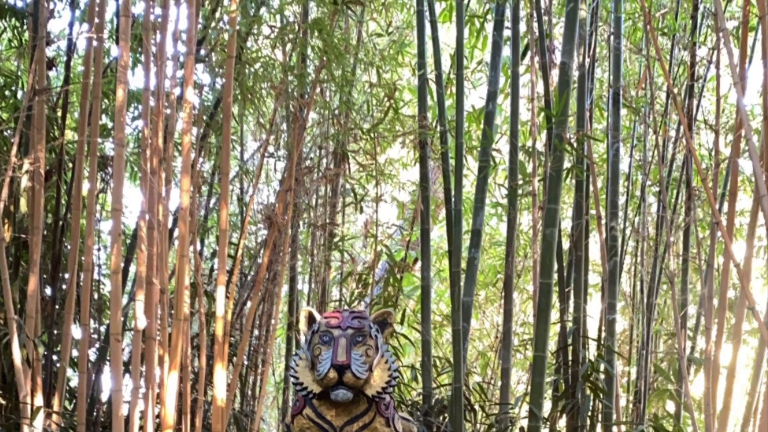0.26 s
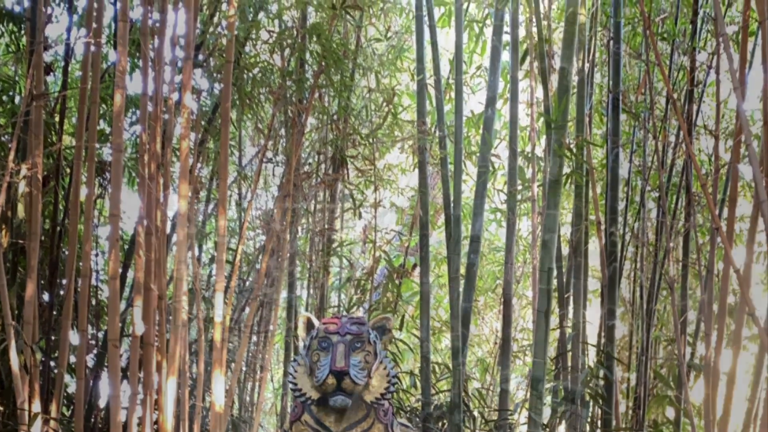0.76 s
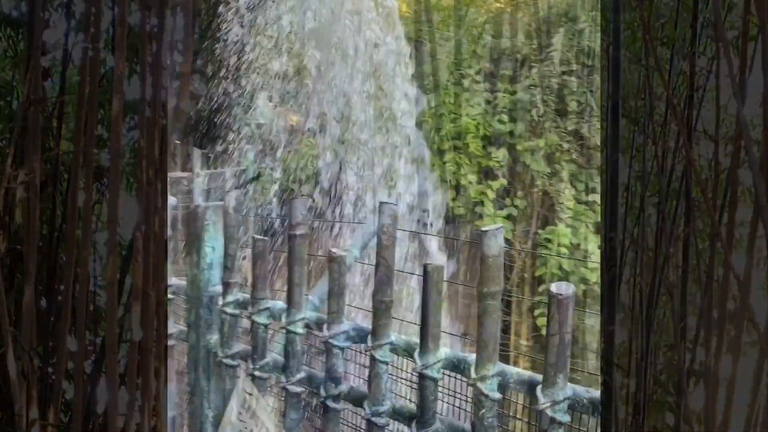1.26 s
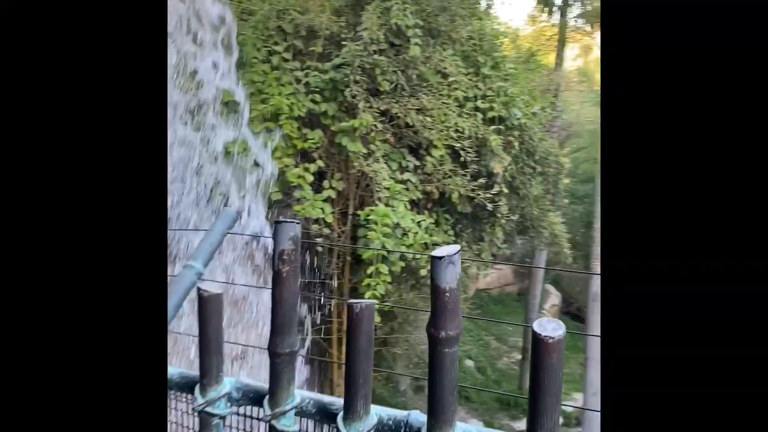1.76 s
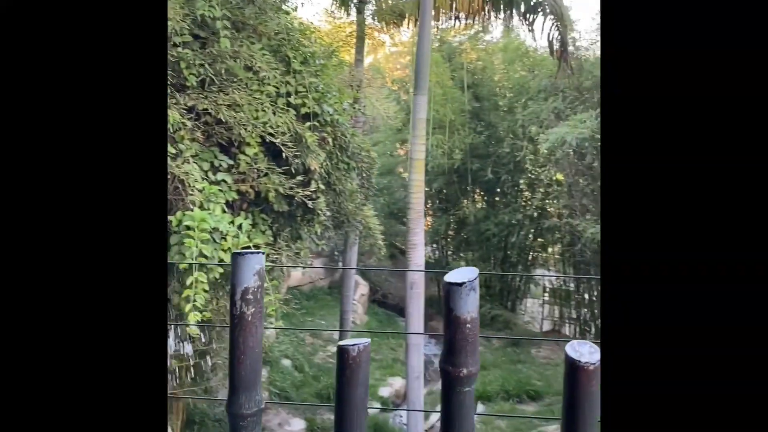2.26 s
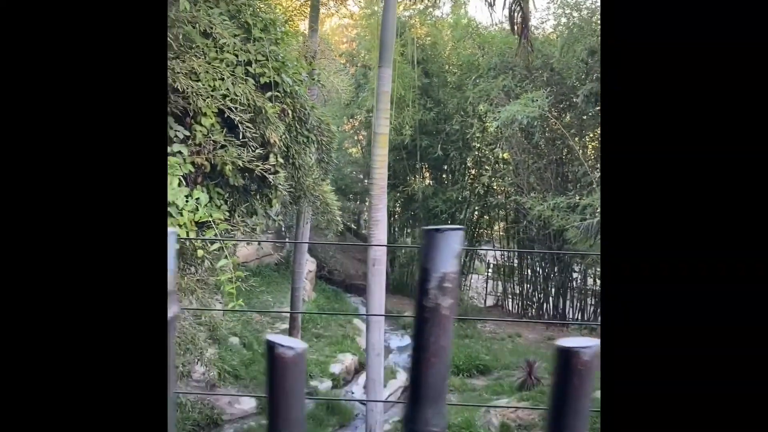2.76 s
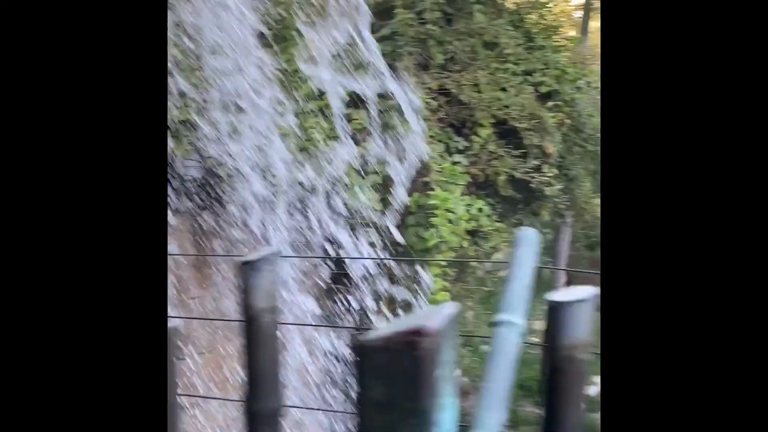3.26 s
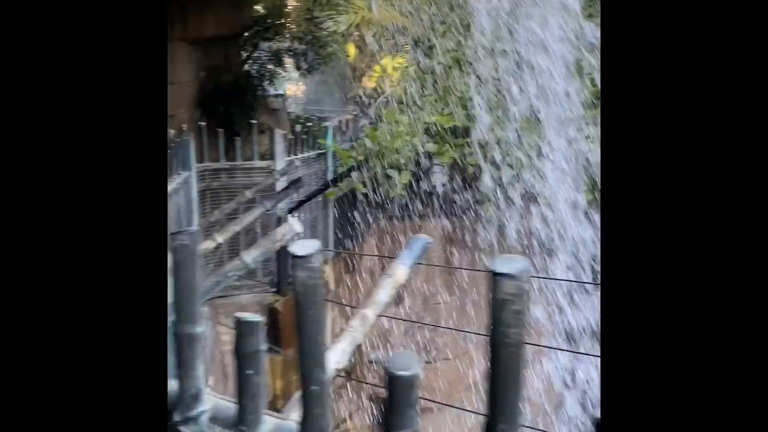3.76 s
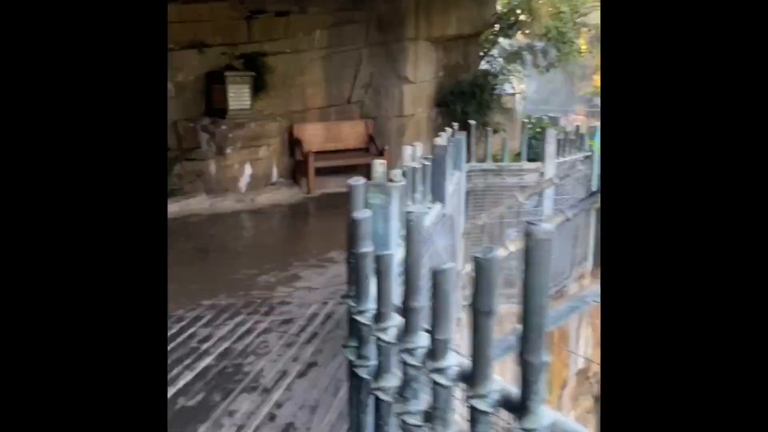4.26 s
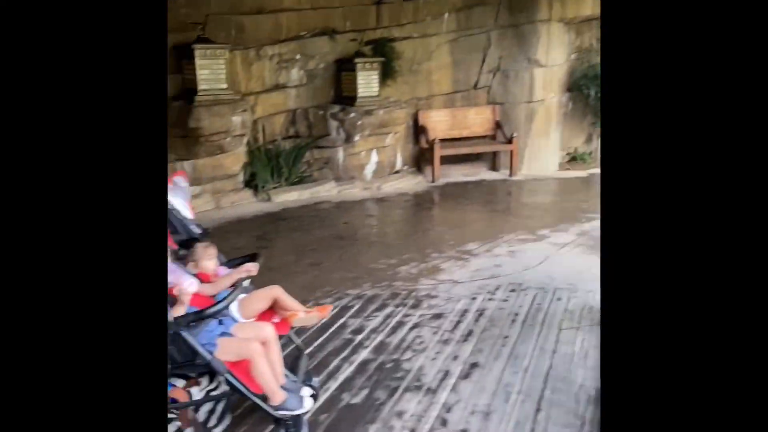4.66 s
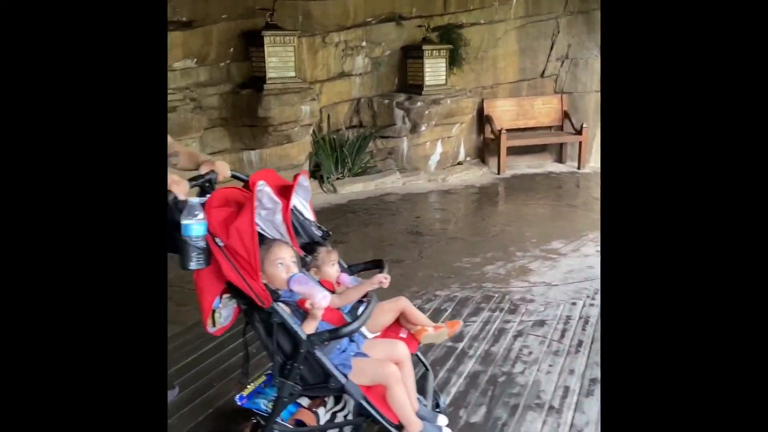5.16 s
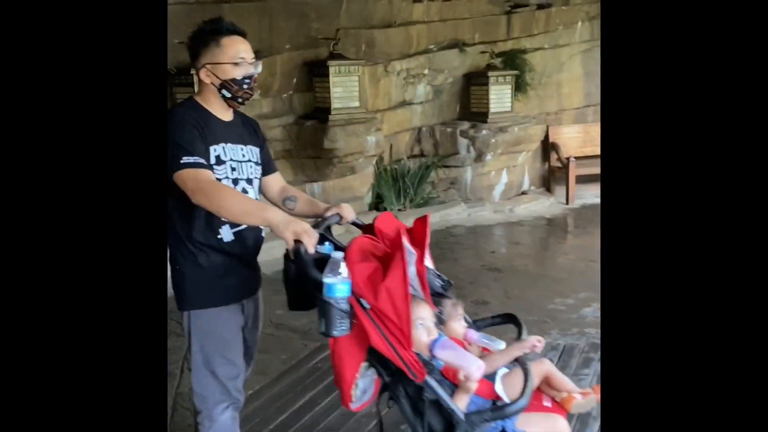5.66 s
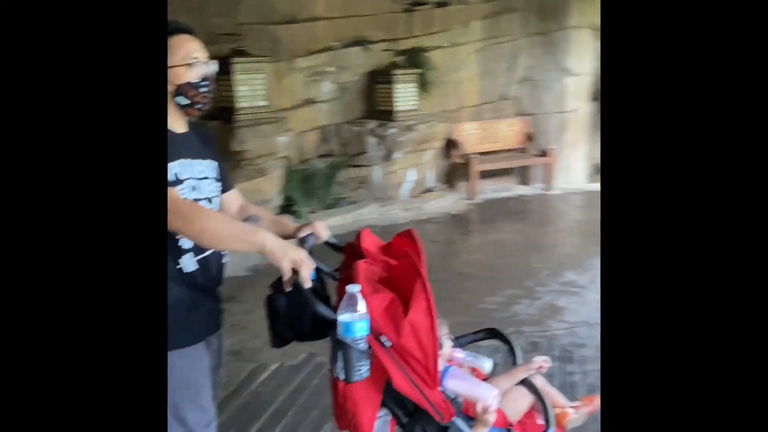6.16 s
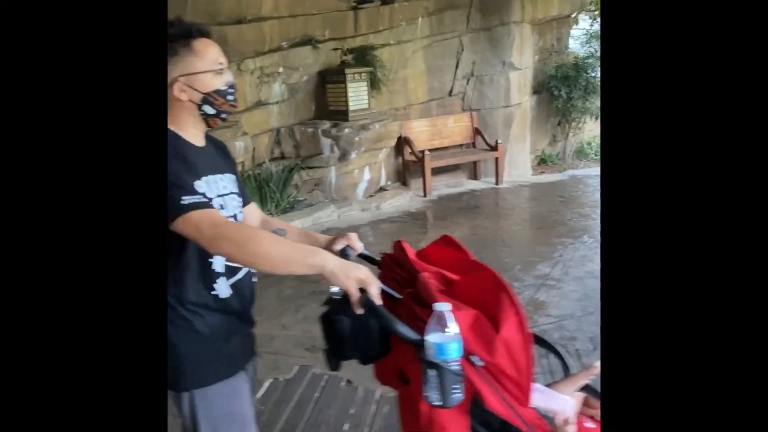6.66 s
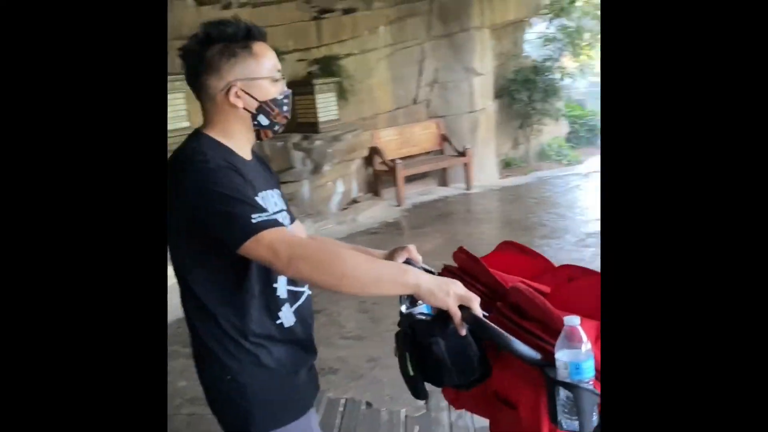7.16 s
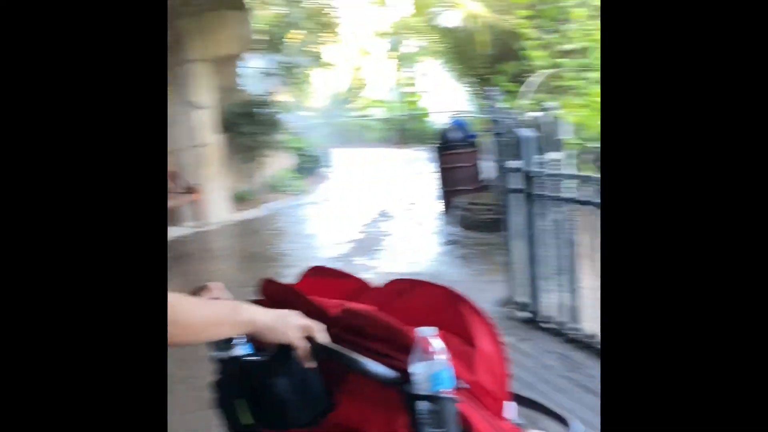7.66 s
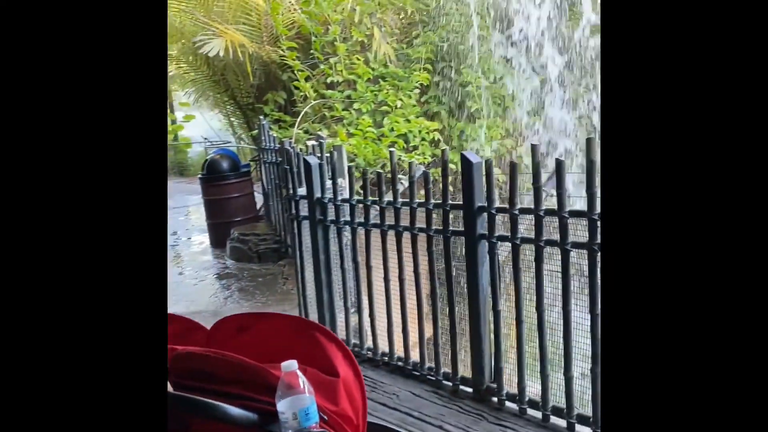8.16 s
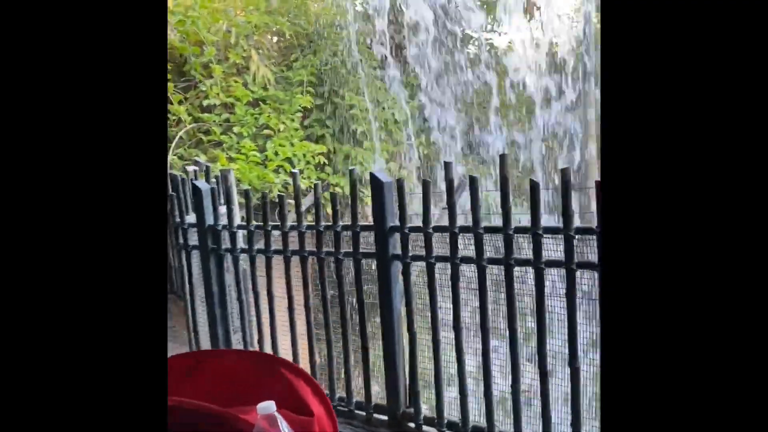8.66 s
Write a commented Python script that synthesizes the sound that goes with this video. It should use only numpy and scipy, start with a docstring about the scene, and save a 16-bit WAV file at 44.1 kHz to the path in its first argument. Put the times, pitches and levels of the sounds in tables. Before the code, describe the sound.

A broad waterfall rushes steadily onto stone and a pool, fading in from silence, its tone shifting as the listener turns toward a rock overhang.

```python
"""Waterfall beside a rock overhang

An artificial waterfall pours over a rock ledge onto stone and a shallow pool, heard from a walkway.
Random impacts make the splashes, chirping decays the bubbles, and noise their smeared return from the rock.
Spectra over time add the plunge, thuds, resonances and reflections of the ground and the rock walls.
The sound fades in while a hand-held microphone pair turns from beside the curtain, across it, to the overhang.
"""
import sys
import numpy as np
from scipy import signal
from scipy.fft import rfft, irfft
from scipy.io import wavfile
from scipy.ndimage import uniform_filter1d

SR = 44100
rng = np.random.default_rng(int(sys.argv[2]) if len(sys.argv) > 2 else 0)


def transcribe(u):
    """Save the signal u as a 16-bit wav file named by the first command-line argument.

    u: samples, shape (n,) or (channels, n), limited to [-1, 1]; the rate is SR.
    q: integer samples, one column per channel.
    """
    v = np.clip(np.atleast_2d(u).T, -1, 1)
    q = np.round(v * 32767).astype(np.int16)
    wavfile.write(sys.argv[1], SR, q)


N = 392490
TOP_HZ = 15750  # upper limit of the sound
FRAME, HOP = 2048, 512  # short-time spectra, in samples
T = np.arange(N) / SR  # time of each sample, s
HZ = np.maximum(np.arange(FRAME // 2 + 1) * SR / FRAME, 1)[:, None]  # frequency of each bin
FRAME_S = np.arange(int(np.ceil(N / HOP)) + 1) * HOP / SR  # time of each frame, s


def water(flow, bubble_db=-6.0, wash_db=-0.5):
    """Superposition of sources: splashes, bubbles and their smeared return from the rock, as noise."""
    wash = rng.standard_normal(N)
    mix = splashes(flow) + undb(bubble_db) * bubbles(flow) + undb(wash_db) * wash
    return whiten(mix)


def splashes(flow, drop_rate=9000, drop_scatter_db=2.0, slap_rate=220, slap_s=0.0069, slap_db=-6):
    """Impact noise: single drops tick on the stone; larger clumps burst into decaying spatter. Rates per s."""
    drops = impacts(drop_rate * flow, drop_scatter_db)
    blows = np.abs(impacts(slap_rate * flow, scatter_db=2.5))
    envelope = signal.lfilter([1], [1, -np.exp(-1 / (slap_s * SR))], blows)
    spatter = envelope * rng.standard_normal(N)
    return unit(drops + undb(slap_db) * unit(spatter))


def impacts(rate, scatter_db):
    """Shot noise: randomly timed blows, many small and a few large; the rate may vary per sample."""
    size_db = scatter_db * np.minimum(rng.exponential(size=N), 5)
    struck = rng.random(N) < rate / SR
    return unit(struck * rng.choice([-1, 1], N) * undb(size_db))


def bubbles(flow, low_hz=220, high_hz=9000, cycles=18, rise=0.074, scatter_db=1.5, rate_at_1khz=40, count=40):
    """Bubble resonance: trapped air rings, decays and rises in pitch; small bubbles are more numerous."""
    out = np.zeros(N)
    for hz in np.geomspace(low_hz, high_hz, count):
        life = cycles / hz
        age = np.arange(int(2 * life * SR) + 1) / SR
        number = int(rate_at_1khz * np.sqrt(hz / 1000) * N / SR)
        births = rng.choice(N, number, p=flow / flow.sum())  # more where the flow is strong
        chance = rng.random((number, 2))
        pitch = hz * (.94 + .12 * chance[:, :1])
        size = undb(-scatter_db * np.log(np.maximum(chance[:, 1:], .01)))
        decay = np.exp(-np.pi * age / life)
        rings = size * decay * np.sin(2 * np.pi * pitch * age * (1 + rise * age / life))
        places = births[:, None] + np.arange(len(age))
        out += np.sqrt(hz) * unit(np.bincount(places.ravel(), rings.ravel(), N)[:N])
    return unit(out)


def patches(depth_db=0.63, splash_db=1.4, splash_hz=3200, splash_octaves=0.68, rate=24, count=48):
    """Independent band fluctuation: clumps land on different spots, so narrow bands flare and fade alone."""
    centres = np.geomspace(500, 12000, count)
    flicker = sum(over_hz(centres, weights) * walk(rate, FRAME_S) for weights in np.eye(count)[1:])
    swing_db = depth_db + splash_db * band(splash_hz, splash_octaves)  # strongest in the splash
    return undb(swing_db * flicker)


def thuds():
    """Cavity resonance: a band lifts, in dB, as each mass lands; the cavity that it opens sets the pitch."""
    # heavy masses of water hitting the pool: centre_s, half_length_s, pitch_hz, width_octaves, lift_db
    masses = [(1.182, 0.094, 160, 1.1, 5.5), (1.58, 0.14, 110, .4, 7.5), (2.562, 0.036, 230, .6, 4),
              (2.72, 0.054, 175, .5, 5), (3.566, .05, 80, 1.3, 6), (3.59, 0.045, 180, 0.27, 7),
              (3.705, 0.037, 378, 0.39, 6), (4.25, 0.055, 185, .4, 3.5), (6.82, .04, 420, .5, 3.5),
              (8.33, .035, 380, .6, 5)]
    return sum(db * band(hz, octaves) * pulse(s, half_s) for s, half_s, hz, octaves, db in masses)


def pool_pass(centre_s=3.38, half_s=0.29, lift_db=4.5, gurgle_hz=670, octaves=0.33):
    """Directional reception: the gurgle swells as the microphones sweep past where curtain meets pool."""
    return lift_db * band(gurgle_hz, octaves) * pulse(centre_s, half_s)


def colour(surge_db=0.5, gurgle_flicker_db=0.15, trim_db=0.99):
    """Spectral shaping by loudness and heading: gain of the rush in each bin and frame."""
    # loudness of the fall where the listener stands, before the trim: time_s, level_db
    loudness = [(1.55, -25), (2.0, -26.5), (3.2, -26), (3.6, -24), (3.9, -23.5), (4.25, -23.5), (4.55, -25),
                (5.7, -26), (6.8, -25.5), (8.1, -24.5), (8.85, -25)]
    # colour of the rush, before scaling to rms 1: frequency_hz, level_db
    rush_colour = [(25, -24), (55, -6), (130, -2), (300, -2), (480, -2.5), (900, -4), (1400, -6),
                   (1850, -6), (2550, -1.24), (3800, -3.5), (4750, -1.94), (6200, -4.5), (7300, -5),
                   (8000, -4.5), (12000, -5.5), (13400, -8), (15500, -14)]
    level_db = curve(loudness)
    swell_db, away = level_db - level_db.mean(), turned()

    # turning away shades plunge and spray and brings the pool forward;
    # with loudness the spray gains and the plunge loses, the spray being more directional
    turn_rumble_db, turn_gurgle_db, turn_spray_db = -1.7, 0.56, -1.15
    rumble_beaming, spray_beaming = -0.61, 0.29  # extra dB per dB of loudness
    plunge, below_gurgle, below_spray = below(230), below(760), below(6800)
    rumble_db = turn_rumble_db * away + rumble_beaming * swell_db + surge_db * walk(11, FRAME_S)
    gurgle_db = turn_gurgle_db * away + gurgle_flicker_db * walk(18, FRAME_S)
    spray_db = turn_spray_db * away + spray_beaming * swell_db
    tone_db = plunge * rumble_db + (below_gurgle - plunge) * gurgle_db + (1 - below_spray) * spray_db

    tone_db += direct_splash() + pool_pass() + thuds() + booms() + deep_bass() + cavities()
    rush = unit(undb(over_hz(*np.transpose(rush_colour))) * (HZ < TOP_HZ))
    return rush * undb(trim_db + level_db + tone_db)


def direct_splash():
    """Line of sight: midrange lift, in dB, from splashing while the curtain is in line with the ports."""
    # bands of the direct splashing: frequency_hz, width_hz, lift_db
    splash_bands = [(950, 950, 2), (1710, 500, 0.6), (2320, 210, 1.5)]
    # how squarely the splashing reaches the ports: time_s, share
    in_line = [(1.55, 1.2), (2.1, 0.76), (3.25, 1), (3.8, 0), (5.5, 0.55), (7.5, 0), (8.5, 0.081)]
    return curve(in_line) * ring(splash_bands)


def deep_bass(edge_hz=110):
    """Low-frequency level variation: the deepest bass changes along the way, in dB."""
    # change of the deepest bass: time_s, change_db
    depths = [(1.5, -2), (2.2, 0), (2.9, -1.5), (3.5, 3.5), (4.1, -3), (5.2, -0.5), (6.5, 1), (7.5, 1.5),
              (8.6, -1.5)]
    return curve(depths) * below(edge_hz)


def drone(x, mode_hz=181, width_hz=15):
    """Driven cavity resonance: the falling water keeps a narrow mode of the hollow humming near 181 Hz."""
    # how far the mode stands out of the rush along the way: time_s, lift_db
    hum_lift = [(1.3, 5.5), (3.2, 7), (3.6, 9), (4.3, 9), (4.7, 7), (5.5, 5.5), (7.3, -1), (8.4, -1),
                (8.8, 8.5)]
    humming = signal.lfilter(*signal.iirpeak(mode_hz, mode_hz / width_hz, fs=SR), x)
    gain = undb(np.interp(T, *np.transpose(hum_lift)))
    return x + (gain - 1) * humming


def cavities():
    """Cavity modes and standing waves, in dB: the hollow's ring trades places with the overhang's."""
    # ring of the hollow behind the curtain: frequency_hz, width_hz, lift_db
    hollow = [(156, 25, 3), (222, 38, -3), (320, 70, 0.6), (410, 50, 2)]
    # ring of the space under the rock overhang: frequency_hz, width_hz, lift_db
    overhang = [(245, 36, 4.5), (310, 36, 2.5), (425, 80, 1.7), (650, 83, 0.9)]
    # standing waves between the rock walls, all along the walkway: frequency_hz, width_hz, lift_db
    standing = [(58.2, 15.6, 9), (89.3, 12, 3.5), (119, 13, 1.5)]
    # how open the hollow lies to the listener: time_s, share (0-1)
    opening = [(1.3, .55), (2.6, 0.84), (3.5, 0.9), (4.35, 1), (5.0, 0.7), (5.6, 0.1), (6.3, 0.4), (7.2, 0),
               (8.3, 0.4), (8.85, 0.4)]
    share = np.clip(curve(opening), 0, 1)
    return ring(standing) + share * ring(hollow) + (1 - share) * ring(overhang)


def booms():
    """Wall resonances and nulls, in dB, that the listener walks through; pitch slides with the distance."""
    # resonances, and nulls with a negative lift:
    # centre_s, half_length_s, pitch_hz, glide_hz_per_s, width_hz, lift_db
    wall_spots = [(2.3, 0.77, 268, 0, 36, 4), (4.15, 0.82, 342, 0, 85, 4), (3.9, 0.91, 475, 0, 60, 1.5),
                  (5.2, .4, 275, 64, 55.3, -4.5), (5.9, 0.68, 425, -20, 70, 3.5),
                  (6.3, .55, 295, 50, 40, 3.5), (6.95, 0.43, 490, 55, 50, 4), (7.6, .7, 680, -34, 110, 3.7),
                  (8.45, .45, 316, -3, 32, 7), (8.45, .3, 500, 0, 40, 3.5), (8.6, .5, 405, 0, 60, -3)]
    lift_db = 0
    for s, half_s, hz, glide, width, db in wall_spots:
        gliding_hz = hz + glide * (FRAME_S - s)
        lift_db = lift_db + ring([(gliding_hz, width, db)]) * pulse(s, half_s)
    return lift_db


def reflections(drift=0.1994, small_hz=400, rough_hz=3500):
    """Comb filtering by near surfaces; bass diffracts round them, treble scatters, and motion slides the comb."""
    # early reflections from deck, fence and rock: lag_s, strength
    surfaces = [(.0021, 0.071), (.0039, 0.12), (.0062, 0.18), (.0095, .16), (0.013, 0.19)]
    echoes = 0
    for lag, strength in surfaces:
        moving_lag = lag * (1 + drift * walk(.6, FRAME_S))
        echoes = echoes + strength * np.exp(-2j * np.pi * HZ * moving_lag)
    return 1 + echoes / np.sqrt(1 + (small_hz / HZ) ** 2 + (HZ / rough_hz) ** 2)


def turned():
    """Orientation: how far the listener faces away from the curtain, 0-1 per frame."""
    # turning away, and partly back at the end: time_s, turned_away (0-1)
    heading = [(3.1, 0), (3.7, 0.23), (4.6, 0.53), (5.4, 0.9), (7.5, 0.96), (8.4, 0.66)]
    return np.clip(curve(heading), 0, 1)


def ports(common, apart):
    """Inter-channel coherence: the right channel shares part of the left, shifted in phase."""
    # likeness of the two channels beside the curtain (near), then turned away (far); the top is opposite in sign:
    # frequency_hz, near_coherence, near_left_lead_rad, far_coherence, far_left_lead_rad
    likeness = [(30, .98, 0, .98, 0), (190, .998, 0, .998, 0), (350, .99, .08, .985, -.13),
                (520, .87, .72, .81, -.15), (900, .72, 1.5, .16, 0), (1200, .58, 1, .2, 1.1),
                (1400, .66, .55, .38, .75), (1850, .8, .25, .6, .3), (2250, .5, .85, .34, 1.9),
                (2480, .42, 1.8, .55, 2.45), (2870, .66, 2.8, .6, 2.35), (3400, .05, 2.9, .38, 2.55),
                (3800, .3, .9, .42, 2.4), (4400, .38, 2.3, .54, 2.55), (4830, .93, 3.08, .83, 3.03),
                (5100, .58, 3.5, .52, 3.35), (5600, .74, .55, .72, .6), (5950, .83, .8, .82, .8),
                (7000, .84, 1.2, .83, 1.2), (8500, .85, 1.7, .85, 1.7), (11700, .85, 2.4, .85, 2.4),
                (12500, .92, 2.85, .92, 2.85), (13000, 1, 3.14, 1, 3.14)]
    # bands in which the body of the recorder shades one port, left minus right:
    # frequency_hz, width_octaves, beside_curtain_db, turned_away_db
    shade = [(490, .3, -.2, -1.2), (1010, .55, 6.5, 1.4), (1950, 0.38, -2, 1.2), (3700, 0.38, -1, -1.6)]
    hz, near_coherence, near_lead, far_coherence, far_lead = np.transpose(likeness)
    away = turned()
    near = over_hz(hz, near_coherence * np.exp(-1j * near_lead))
    far = over_hz(hz, far_coherence * np.exp(-1j * far_lead))
    shared = (1 - away) * near + away * far
    separate = np.sqrt(np.maximum(1 - np.abs(shared) ** 2, 0))  # keeps the power constant
    right = shared * common + separate * apart
    balance_db = sum(band(centre_hz, octaves) * ((1 - away) * beside_db + away * away_db)
                     for centre_hz, octaves, beside_db, away_db in shade)
    return np.array([common * undb(balance_db / 2), right * sway() * undb(-balance_db / 2)])


def sway(turn_rad=0.31, hz=4500, octaves=0.41, rate=7):
    """Phase modulation: the unsteady hand makes the phase between the channels wander around 4500 Hz."""
    return np.exp(1j * turn_rad * band(hz, octaves) * walk(rate, FRAME_S))


def undb(db):
    """Logarithmic level: decibels to amplitude gain."""
    return 10 ** (np.asarray(db) / 20)


def unit(x):
    """Power normalization: scale to rms 1."""
    return x / np.sqrt(np.mean(np.abs(x) ** 2))


def curve(table):
    """Linear interpolation: a table of times and values, one value per frame."""
    return np.interp(FRAME_S, *np.transpose(table))


def over_hz(hz, values):
    """Logarithmic frequency scale: join points by straight lines, one value per bin."""
    return np.interp(np.log(HZ), np.log(hz), values)


def band(hz, octaves):
    """Gaussian band on the log-frequency axis, 1 at its centre."""
    return np.exp(-(np.log2(HZ / hz) / octaves) ** 2)


def pulse(centre_s, half_s):
    """Gaussian pulse in time, 1 at its centre and 1/e at half_s to either side."""
    return np.exp(-((FRAME_S - centre_s) / half_s) ** 2)


def below(edge_hz):
    """Low-pass weighting: 1 in the bass, half at the edge, falling steeply above."""
    return 1 / (1 + (HZ / edge_hz) ** 6)


def ring(modes):
    """Lorentzian resonance: the summed lift in dB that broad modes give each bin."""
    return sum(db / (1 + (2 * (HZ - hz) / width) ** 2) for hz, width, db in modes)


def walk(rate, times):
    """Random modulation: independent levels, rate a second, joined by straight lines; rms 1."""
    levels = rng.standard_normal(1000)
    return unit(np.interp(times * rate, np.arange(len(levels)), levels))


def whiten(x, size=1500):
    """Spectral whitening: even out the long-term spectrum, smoothed over size bins, and keep the grain."""
    spectrum = rfft(x)
    power = uniform_filter1d(np.abs(spectrum) ** 2, size)
    return unit(irfft(spectrum / np.sqrt(power), N))


def frames(x):
    """Short-time Fourier analysis: bins by frames."""
    return signal.stft(x, nperseg=FRAME, noverlap=FRAME - HOP)[2]


def scene(clump_db=0.33):
    """Common excitation: the sheet's uneven clumps drive splashes and bubbles along its whole width."""
    flow = undb(clump_db * walk(16, T))
    path = colour() * patches() * reflections()
    common = frames(drone(water(flow)))
    apart = frames(water(flow))
    heard = ports(common, apart) * path
    return signal.istft(heard, nperseg=FRAME, noverlap=FRAME - HOP)[1][:, :N]


def record(dry, low_cut_hz=36, fade_start_s=0.51, fade_end_s=1.81):
    """Band limiting: the recorder drops the deepest bass, fades in from silence and cuts the top."""
    dry = signal.sosfilt(signal.butter(2, low_cut_hz, "high", fs=SR, output="sos"), dry)
    fade = np.clip((T - fade_start_s) / (fade_end_s - fade_start_s), 0, 1)
    return signal.sosfilt(signal.ellip(12, .1, 90, TOP_HZ, fs=SR, output="sos"), dry * fade)


dry = scene()
out = record(dry)
transcribe(out)
```